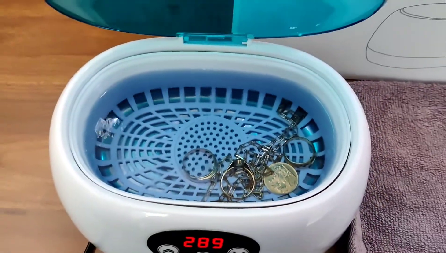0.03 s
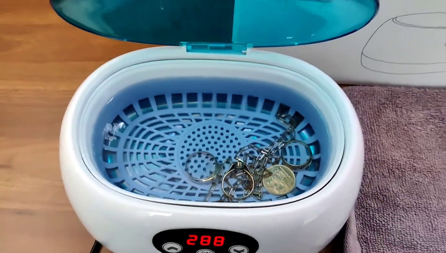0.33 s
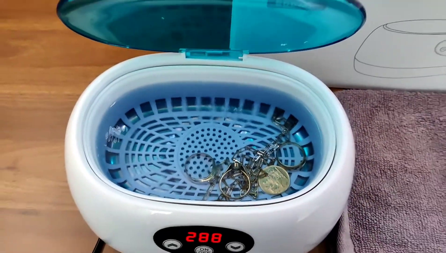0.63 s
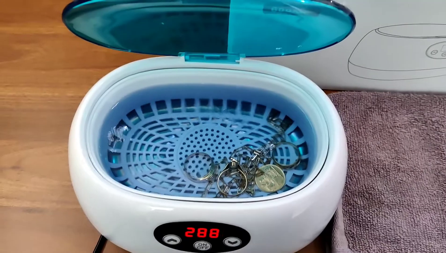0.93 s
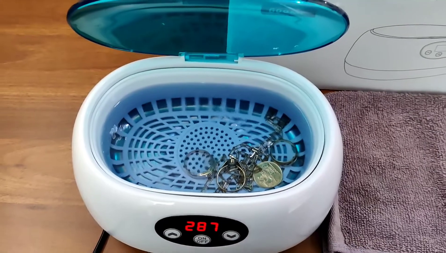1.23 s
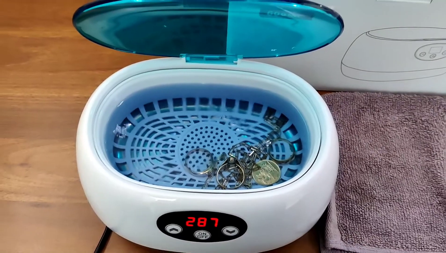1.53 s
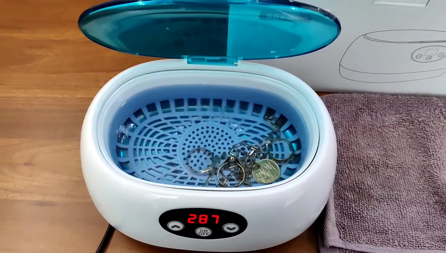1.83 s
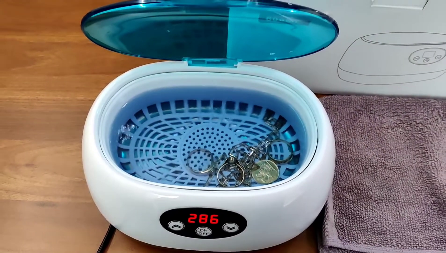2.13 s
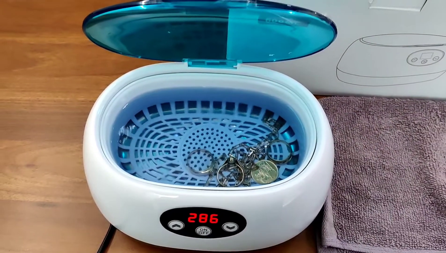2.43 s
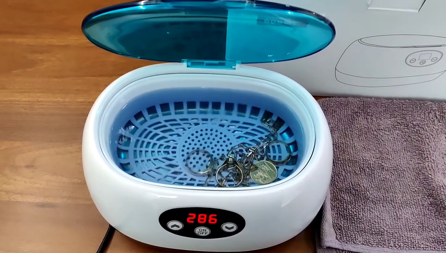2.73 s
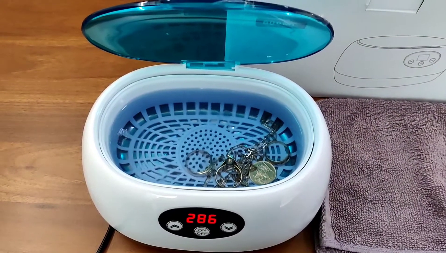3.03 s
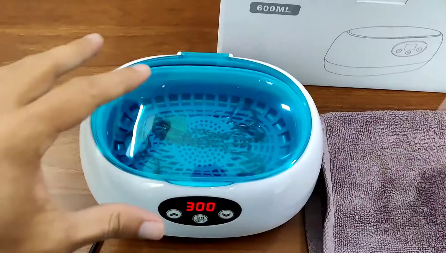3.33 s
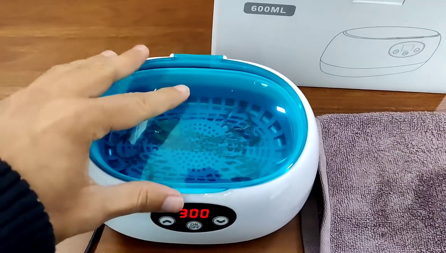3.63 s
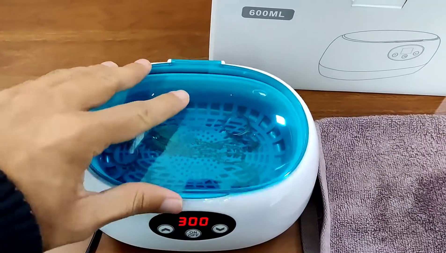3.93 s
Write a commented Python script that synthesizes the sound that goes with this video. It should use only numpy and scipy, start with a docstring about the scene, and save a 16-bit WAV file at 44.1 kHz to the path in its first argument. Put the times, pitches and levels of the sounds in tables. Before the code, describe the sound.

A small ultrasonic cleaner buzzes harshly with dull pops and fizzing water, then stops dead.

```python
"""A hard, edgy buzz with dull pops and fizzing water: a small ultrasonic cleaner, close to a stereo mic.
It fires one burst of ultrasound per mains cycle, and the overloaded capsules rectify each burst into a
dent with sharp edges. Now and then they jump in offset (the pops), and the left one ticks as it clips.
Cavitation in the water fizzes in time with the bursts.
Just after three seconds it all stops dead, and a faint room tone comes up."""
import sys
import numpy as np
from scipy import signal
from scipy.fft import rfft, irfft
from scipy.io import wavfile
from scipy.ndimage import map_coordinates

SR = 44100
rng = np.random.default_rng(int(sys.argv[2]) if len(sys.argv) > 2 else 0)


def wav_record(signal):
    """Record a signal, one row per channel, as 16-bit PCM in the file named by sys.argv[1]."""
    frames = np.transpose(np.atleast_2d(signal))
    bounded = np.clip(frames, -1, 1)
    # unit amplitude maps onto the largest positive 16-bit level
    quanta = np.round(bounded * 32767).astype(np.int16)
    wavfile.write(sys.argv[1], SR, quanta)


N = 176400

# Ultrasound at the mic: time_s, left_depth, left_opening_gain, left_closing_gain, right_depth, right_gain
ULTRASOUND = [(0, 0.16, 0.73, 1.36, 0.0098, 0.61), (.11, 0.024, 0.69, 0.88, 0.01, 0.46),
              (.2, 0.36, 2, 1.4, 0.019, 0.77), (.28, 0.46, 1.3, 0.97, 0.019, 0.53),
              (.36, 0.22, 0.24, 2.5, .07, 0.42), (.52, 0.06, 0.34, 0.24, 0.12, 1.2),
              (.66, 0.073, 0.38, 0.17, 0.086, 0.73), (.8, 0.01, 0.58, 1.24, 0.014, 0.62),
              (1.02, 0.042, 0.62, 1, 0.0046, 0.73), (1.13, .17, 0.37, 1.3, 0.0038, 0.67),
              (1.45, 0.25, 1.31, 1.1, 0.011, 0.51), (1.62, 0.049, 0.26, 1.45, 0.0055, 0.35),
              (1.85, 0.045, 1.47, 0.9, 0.043, .9), (1.98, 0.47, 2.34, 1.46, 0.087, 1.1),
              (2.14, 0.2, 0.93, 1.06, 0.086, 0.48), (2.3, 0.2, 1.55, 1.6, 0.074, 0.27),
              (2.6, 0.18, 1.29, 0.81, 0.06, 0.64), (3.14, 0.067, 1, 1.08, 0.048, 0.73)]
# Resonances the drive sweeps through, two as a burst swells and two as it fades:
# cycle_time_ms, base_half_width_ms, base_depth
LEFT_RESONANCES = [(5.41, 0.18, 0.15), (6.7, 0.18, 0.043), (11.72, 0.24, 0.19), (12.9, 0.13, 0.082)]
RIGHT_RESONANCES = [(5.55, 0.24, 0.11), (6.9, 0.17, 0.041), (10.4, 0.2, 0.075), (11.97, 0.09, 0.1)]
# How much the standing waves shift: time_s, share
WAVE_UNREST = [(0, 0.75), (1.4, 1.0), (1.75, 0.5), (2.3, 0.37), (2.5, 0.23), (3.14, 0.38)]
# Offset jumps of the capsules: start_s, channel (0 left, 1 right), signed_size
OFFSET_JUMPS = [(.051, 0, 1.04), (.130, 0, -0.76), (.151, 0, 1.2), (.385, 0, -1.68), (.406, 1, 1.14),
                (.426, 0, 1.2), (.426, 1, -1.1), (0.447, 1, 1), (.466, 0, -1.17), (.486, 0, 0.58),
                (0.526, 1, -0.47), (.569, 0, -1.48), (0.59, 1, 0.58), (.630, 1, 1), (.750, 0, 1.12),
                (.765, 1, 1.02), (.889, 0, -0.94), (.929, 0, 0.78), (0.969, 0, 0.49), (1.161, 0, -1.02),
                (1.164, 1, -0.3), (1.186, 0, 1.37), (1.284, 0, -1.07), (1.304, 1, -0.44), (1.309, 0, 1.17),
                (1.323, 1, 0.61), (1.343, 1, -0.49), (1.363, 1, 0.53), (1.384, 1, -0.54), (1.403, 0, -0.65),
                (1.403, 1, 0.4), (1.423, 1, -0.42), (1.429, 0, 0.83), (1.482, 0, -0.92), (1.523, 0, -1.2),
                (1.707, 1, 0.71), (1.962, 1, -1.2), (2.043, 0, 1.48), (2.102, 0, -1.05), (2.123, 0, 1.5),
                (2.28, 1, -0.77), (2.303, 0, -1.5), (2.322, 0, 1.58), (2.481, 0, -1.14), (2.507, 0, 1.41),
                (2.601, 0, -1.26), (2.72, 0, 0.89), (2.743, 0, -1.13), (2.863, 0, 1.03), (2.882, 0, -0.78),
                (2.906, 0, 1.5), (3.046, 0, -0.85), (3.086, 0, 1.33)]
# Clipping ticks: time_s, channel (only 0, the left, is played), size
CLIP_TICKS = [(.406, 0, .1), (0.427, 0, .13), (.446, 0, .12), (.545, 1, .07), (.605, 0, .09),
              (2.620, 0, .11), (2.864, 0, .11), (2.879, 0, .16), (3.048, 0, .09)]
# Cavitation in the bath: time_s, base_level_db, centre_hz, top_hiss_gain_db
CAVITATION = [(0, -42.5, 6625, 5), (.04, -43, 6590, 2), (.12, -46.5, 6590, 2.5), (.36, -41.5, 6600, 3.5),
              (.5, -44.5, 6508, 1), (1.03, -47, 6400, -3), (1.27, -43.5, 6400, -4.5),
              (1.65, -49.5, 6287, -0.5), (1.99, -42.5, 6160, 2), (2.15, -47, 6215, 0.5),
              (2.5, -46.5, 6222, 0.5), (3.05, -46.5, 6240, 0.5), (3.14, -49.5, 6290, 3)]
# Fizz colour at each capsule, with the centre at FIZZ_CENTRE_HZ: frequency_hz, relative_density_db
LEFT_FIZZ_COLOUR = [(200, 7), (1000, 8), (2200, 0), (2900, 4), (4400, -9.5), (5300, -2), (6200, 0),
                    (7200, -5.5), (8200, -5), (9000, -20.5), (10500, -17.5), (15000, -23.5)]
RIGHT_FIZZ_COLOUR = [(200, 2.5), (1500, -18.5), (2550, -16.5), (2850, -5.5), (3150, -16.5), (4400, -23),
                     (5600, -4.5), (6400, 2.5), (6900, -4), (7600, -14), (9200, -29.5), (10300, -19.5),
                     (15000, -28.5)]
# Colour of the room tone: frequency_hz, relative_density_db
ROOM_COLOUR = [(25, -1), (60, -11), (85, -24), (125, -21.5), (175, -17), (230, -28), (280, -25), (370, -37),
               (500, -31), (900, -36), (1800, -40.5), (2700, -33.5), (4000, -49), (6000, -40), (9000, -57),
               (15000, -62.5)]
# Rise of the room tone: time_s, level_db
ROOM_RISE = [(3.15, -75.5), (3.38, -61), (3.43, -56), (3.85, -53.5), (4.0, -50)]

MAINS_HZ, STOP_S = 50.1, 3.139
BURST_ON_MS, BURST_OFF_MS, BURST_EDGE_MS = 6.19, 10.736, 0.63   # within the mains cycle
WANDER_MS, WANDER_DB, WANDER_HZ = 0.48, 4, 3.81   # slow drift of the spikes at full unrest
JITTER_MS, JITTER_DB = 0.029, 1.5   # cycle to cycle; the timing jitter scales with unrest
SHARPEN, BLUR = 0.35, 0.24   # spikes narrow with capsule offset and widen with unrest
RIPPLE_DEPTH, RIPPLE_TOP_HZ, RIPPLE_CHANGE_HZ = 0.017, 1300, 3
POP_UP, POP_DOWN = (0.34, 2800), (0.23, 1500)   # snap_share, snap_bandwidth_hz
CREEP_S, POP_TOP_HZ = 0.0064, 3500
TICK_HALF_WIDTH_S = 0.000087
FIZZ_ON_MS, FIZZ_OFF_MS, FIZZ_LAG_S = 5.0, 12, 0.0032
FIZZ_CENTRE_HZ, TOP_HISS_HZ, TOP_THROB_POWER = 6400, 8800, 0.48
COUPLING_HZ = 4.51   # high-pass through which the capsules let go of any offset
HEADROOM, CUTOFF_HZ = 1.5, 15400
TIME = np.arange(N) / SR
CYCLE_MS = TIME * MAINS_HZ % 1 * 1000 / MAINS_HZ


def buzz(depth, opening, closing, resonances, offset):
    """A capsule rectifies each burst into a dent, flanked by spikes that shift with the standing waves."""
    unrest, = in_time(WAVE_UNREST)
    dent = depth * gate(BURST_ON_MS, BURST_OFF_MS)
    off_centre = np.abs(butter(offset, COUPLING_HZ, "high"))
    narrowing = (1 + SHARPEN * off_centre) / (1 + BLUR * unrest)
    spikes = 0
    for (ms, width_ms, size), strength in zip(resonances, (opening, opening, closing, closing)):
        centre_ms = ms + WANDER_MS * unrest * drift(WANDER_HZ)
        centre_ms += JITTER_MS * np.sqrt(np.abs(unrest)) * drift(MAINS_HZ)
        gain = from_db(WANDER_DB * unrest * drift(WANDER_HZ) + JITTER_DB * drift(MAINS_HZ))
        spikes += size * strength * gain / (1 + (narrowing * (CYCLE_MS - centre_ms) / width_ms) ** 2)
    ripple_gain = RIPPLE_DEPTH * np.sqrt(np.abs(depth) / 0.23)
    uneven_top = ripple_gain * ripple() * gate(resonances[0][0], resonances[-1][0])
    return -(dent + spikes + uneven_top)


def ripple():
    """The uneven top of a burst: a pattern that repeats each cycle and slowly changes."""
    period = round(SR / MAINS_HZ)
    pole = np.exp(-2 * np.pi * RIPPLE_CHANGE_HZ / MAINS_HZ)
    noise = rng.standard_normal((2 * N // period, period))
    cycles = signal.lfilter([1], [1, -2 * pole, pole * pole], noise, axis=0)
    return rms_one(butter(cycles.ravel()[-N:], RIPPLE_TOP_HZ))


def pops(channel):
    """The offset of an overloaded capsule snaps part of the way, then creeps the rest."""
    offset = 0
    for sign, (snap, snap_hz) in ((1, POP_UP), (-1, POP_DOWN)):
        steps = sum(size * (TIME >= start_s) for start_s, side, size in OFFSET_JUMPS
                    if side == channel and size * sign > 0)
        offset += snap * butter(steps, snap_hz, order=1) + (1 - snap) * lag(steps, CREEP_S)
    return butter(offset, POP_TOP_HZ)


def left_ticks():
    """Very short spikes as the left capsule clips."""
    return -sum(size / (1 + ((TIME - time_s) / TICK_HALF_WIDTH_S) ** 2)
                for time_s, side, size in CLIP_TICKS if side == 0)


def fizz(colour, gain_db, throb_floor):
    """Cavitation sizzle swells with each burst and slowly sinks in pitch; its top hiss throbs less."""
    level_db, centre_hz, top_db = in_time(CAVITATION)
    throb = throb_floor + (1 - throb_floor) * lag(gate(FIZZ_ON_MS, FIZZ_OFF_MS), FIZZ_LAG_S)
    position = np.cumsum(centre_hz / FIZZ_CENTRE_HZ)   # reading the noise slower lowers its colour
    hiss = map_coordinates(coloured(colour), [position], order=5, mode="wrap")
    top = butter(hiss, TOP_HISS_HZ, "high", order=4)
    top = butter(top[::-1], TOP_HISS_HZ, "high", order=4)[::-1]   # backward pass cancels the phase shift
    sizzle = rms_one(throb) * (hiss - top)
    top_hiss = from_db(top_db) * rms_one(throb ** TOP_THROB_POWER) * top
    return from_db(level_db + gain_db) * (sizzle + top_hiss)


def room_tone():
    """Faint low rumble of the room, separate at each capsule, rising after the stop."""
    level_db, = in_time(ROOM_RISE)
    return from_db(level_db) * np.array([coloured(ROOM_COLOUR), coloured(ROOM_COLOUR)])


def gate(on_ms, off_ms):
    """A soft-edged window, open for part of every mains cycle."""
    rise = 1 + np.tanh((CYCLE_MS - on_ms) / BURST_EDGE_MS)
    fall = 1 + np.tanh((off_ms - CYCLE_MS) / BURST_EDGE_MS)
    return rise * fall / 4


def coloured(colour):
    """Noise of unit rms with the given spectrum."""
    hz, db = np.transpose(colour)
    gain = from_db(np.interp(np.log(np.fft.rfftfreq(N, 1 / SR) + 1), np.log(hz), db))
    return rms_one(irfft(rfft(rng.standard_normal(N)) * gain, N))


def drift(rate_hz):
    """Random wander of unit rms, mostly below rate_hz."""
    rolloff = 1 + (np.fft.rfftfreq(N, 1 / SR) / rate_hz) ** 4
    return rms_one(irfft(rfft(rng.standard_normal(N)) / rolloff, N))


def butter(x, hz, kind="low", order=2):
    """Causal Butterworth filter."""
    return signal.sosfilt(signal.butter(order, hz, kind, fs=SR, output="sos"), x)


def lag(x, seconds):
    """One-pole smoothing."""
    pole = np.exp(-1 / (seconds * SR))
    return signal.lfilter([1 - pole], [1, -pole], x + 1e-18)


def in_time(rows):
    """Each value column of a timed table, at every sample."""
    time_s, *columns = np.transpose(rows)
    return [np.interp(TIME, time_s, column) for column in columns]


def from_db(db):
    """Decibels to gain."""
    return 10 ** (np.asarray(db) / 20)


def rms_one(x):
    """Scale to unit rms."""
    return x / np.sqrt(np.mean(x ** 2) + 1e-20)


def scene():
    """The cleaner close on both capsules until its sound breaks off abruptly, with the room behind it."""
    left_depth, opening, closing, right_depth, right_gain = in_time(ULTRASOUND)
    left_pops, right_pops = pops(channel=0), pops(channel=1)
    left = buzz(left_depth, opening, closing, LEFT_RESONANCES, left_pops) + left_pops + left_ticks()
    left += fizz(LEFT_FIZZ_COLOUR, gain_db=2, throb_floor=1)   # a floor of 1: no throb on this side
    right = buzz(right_depth, right_gain, right_gain, RIGHT_RESONANCES, right_pops) + right_pops
    right += fizz(RIGHT_FIZZ_COLOUR, gain_db=6.5, throb_floor=0.19)
    running = np.clip((STOP_S - TIME) / 0.001, 0, 1)
    return butter(np.array([left, right]), COUPLING_HZ, "high") * running + room_tone()


def record(dry):
    """The mic chain rounds the peaks and cuts the top steeply."""
    rounded = HEADROOM * np.tanh(dry / HEADROOM)
    return signal.sosfilt(signal.ellip(10, 0.2, 80, CUTOFF_HZ, fs=SR, output="sos"), rounded)


dry = scene()
out = record(dry)
wav_record(out)
```